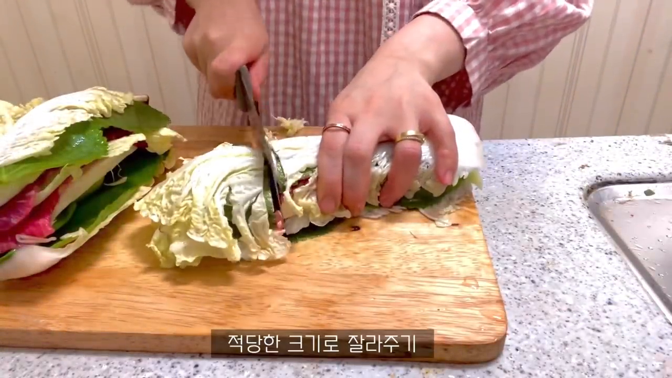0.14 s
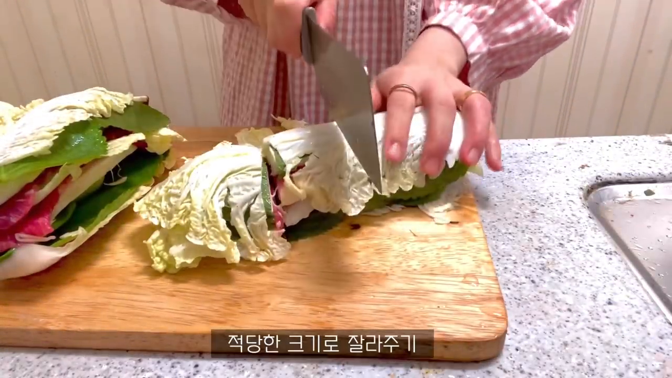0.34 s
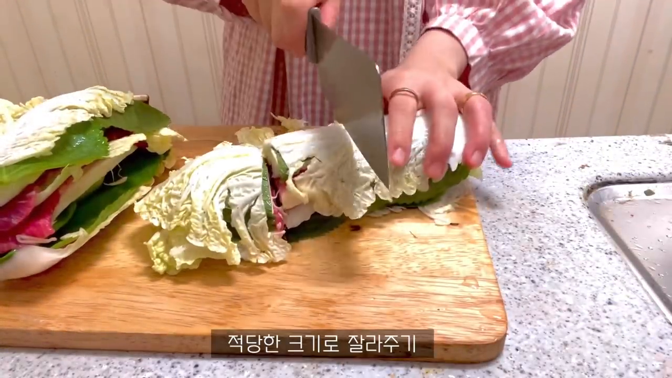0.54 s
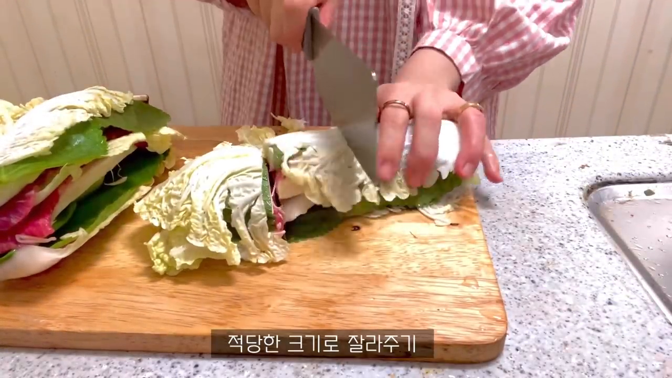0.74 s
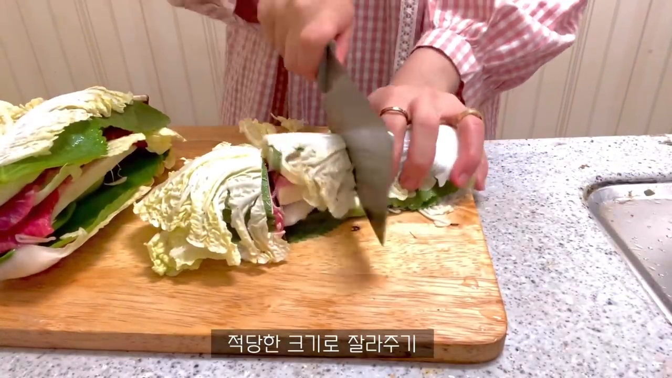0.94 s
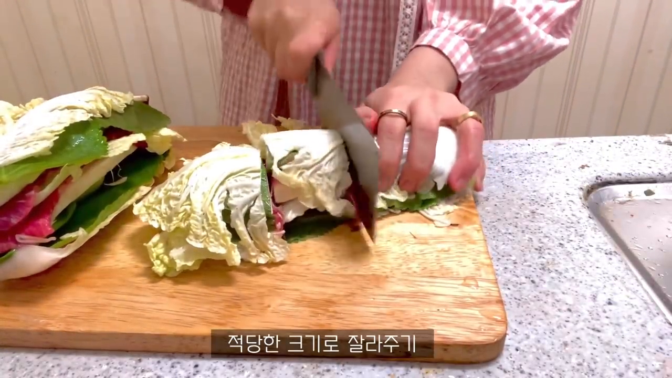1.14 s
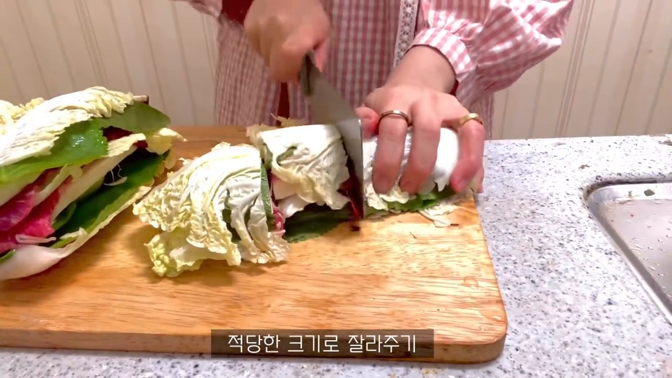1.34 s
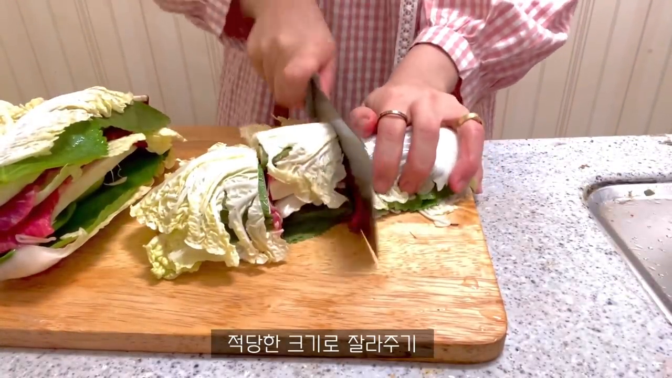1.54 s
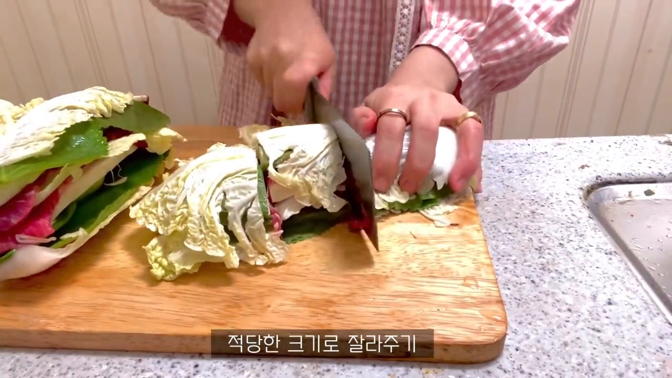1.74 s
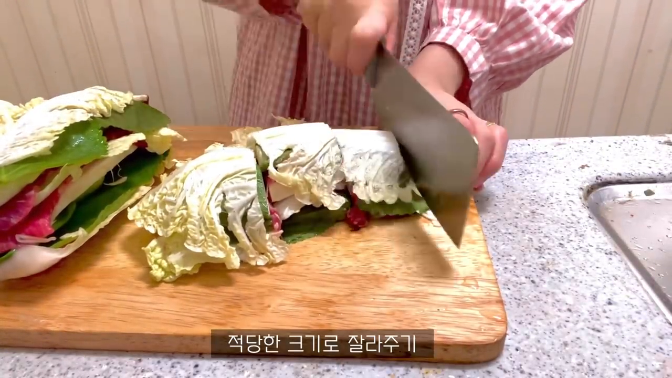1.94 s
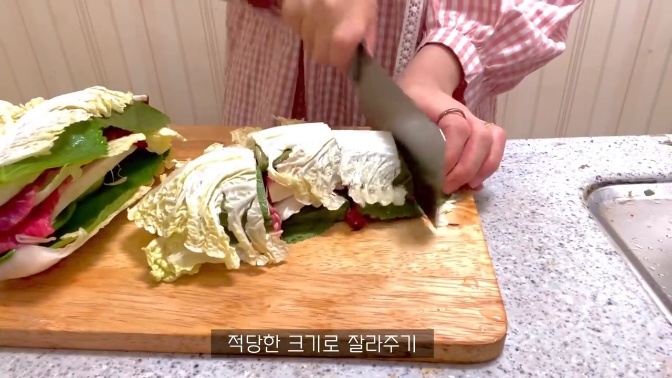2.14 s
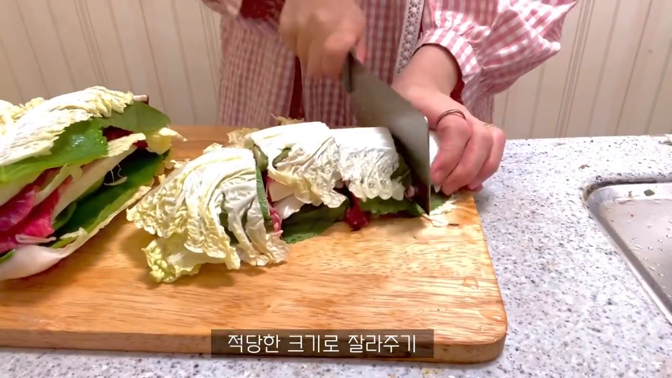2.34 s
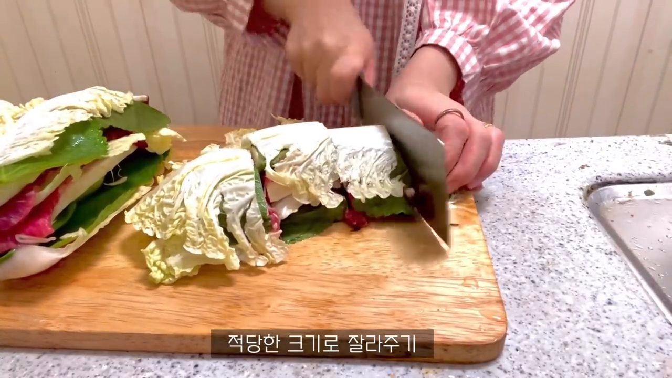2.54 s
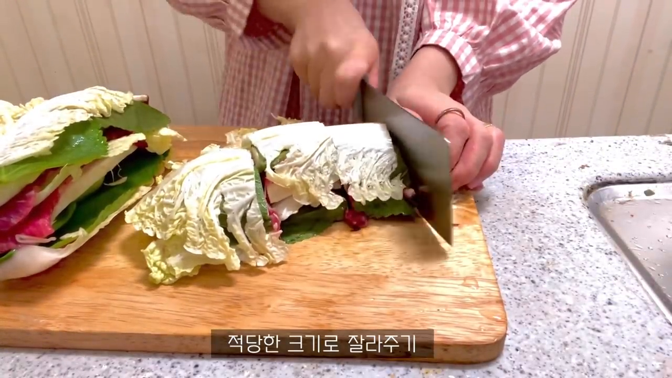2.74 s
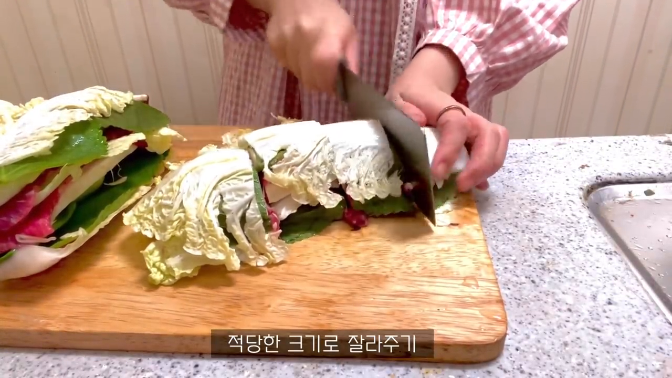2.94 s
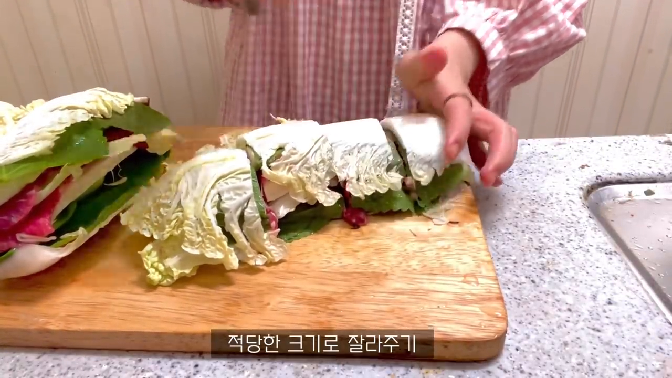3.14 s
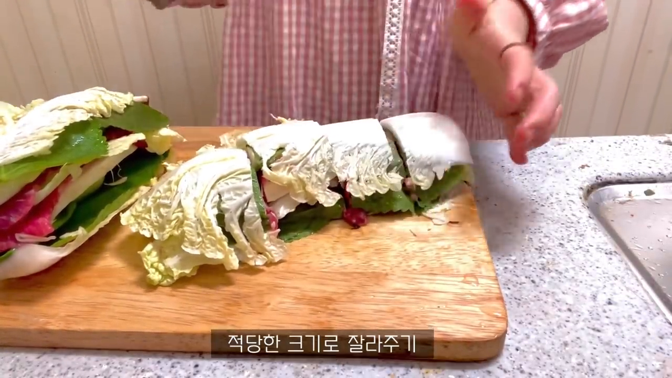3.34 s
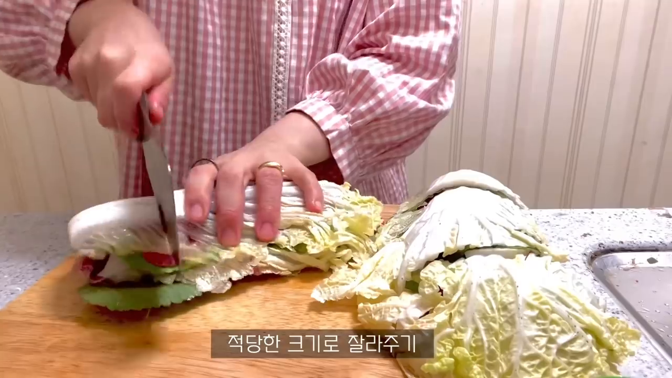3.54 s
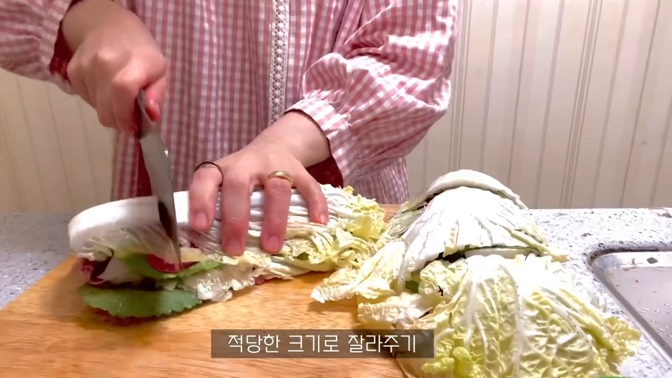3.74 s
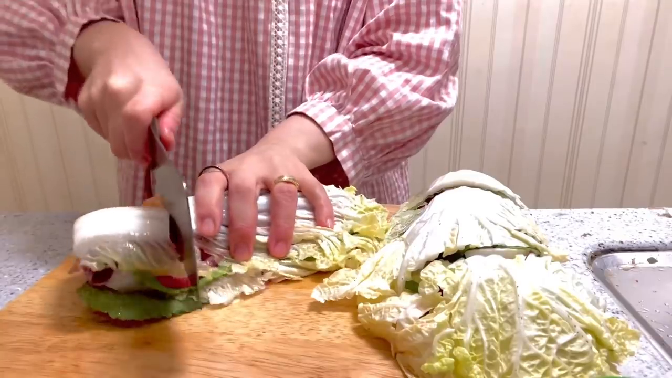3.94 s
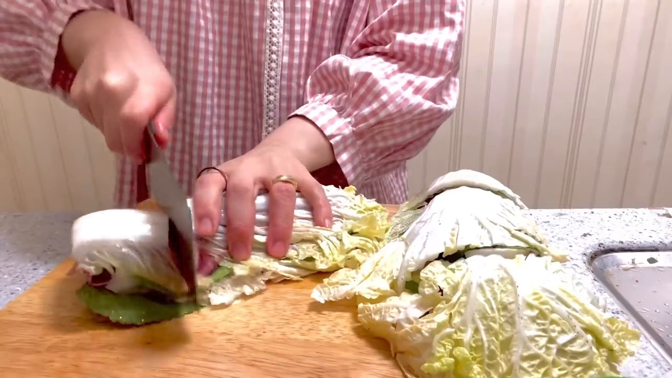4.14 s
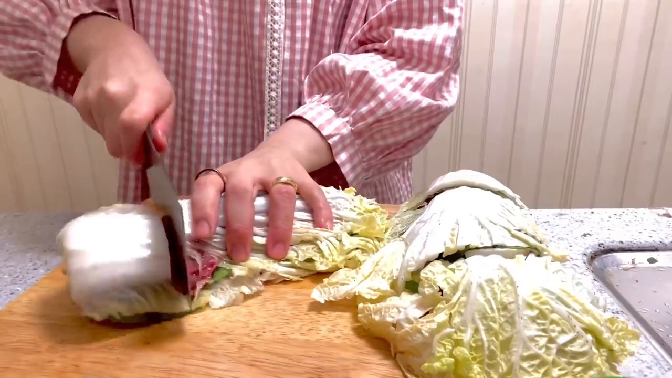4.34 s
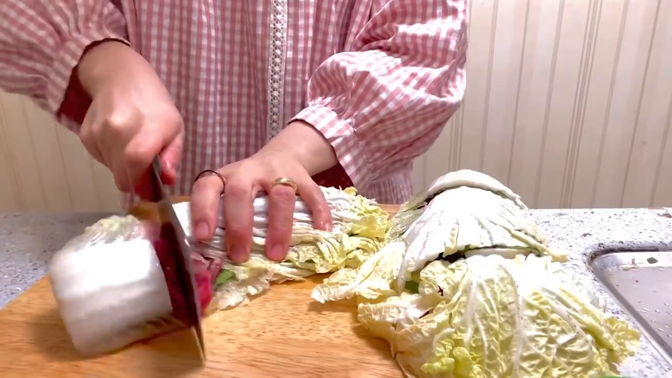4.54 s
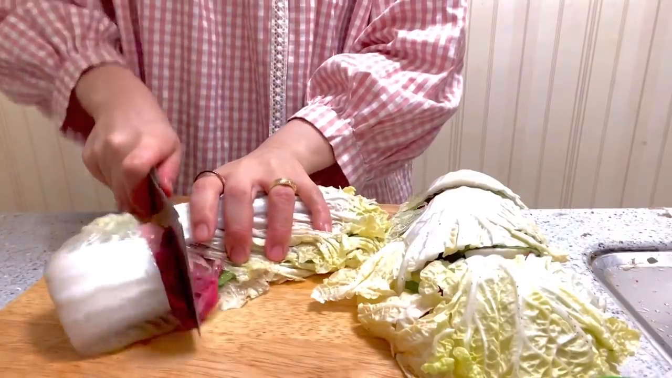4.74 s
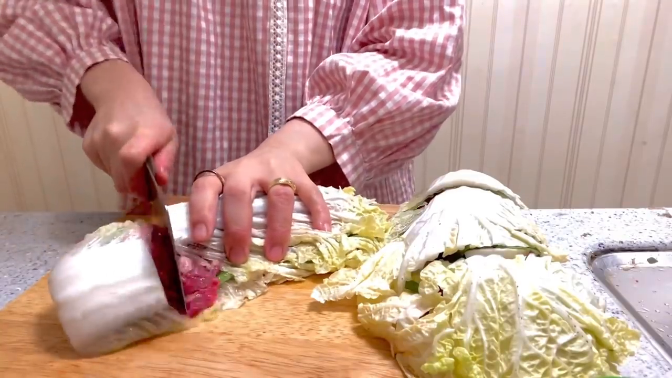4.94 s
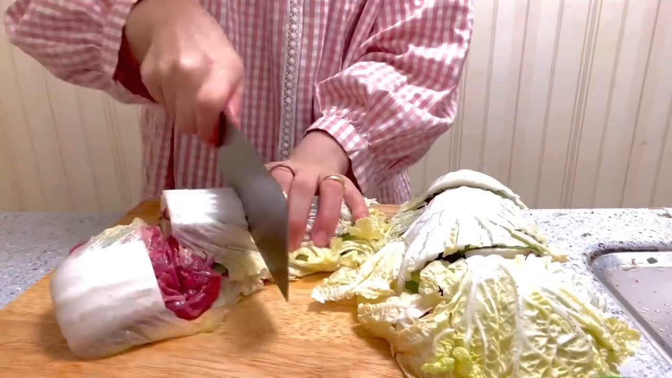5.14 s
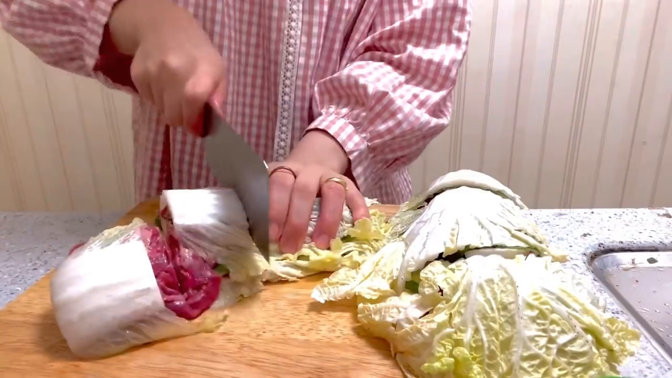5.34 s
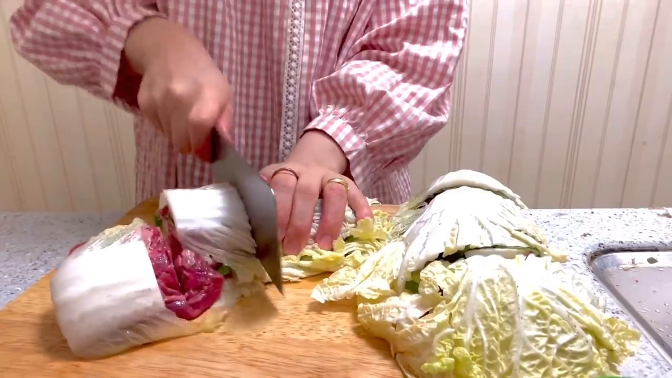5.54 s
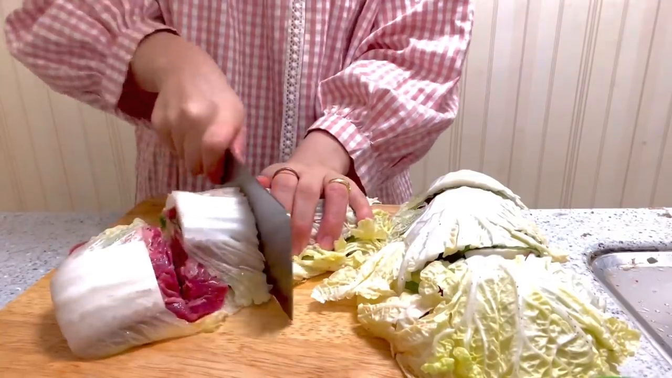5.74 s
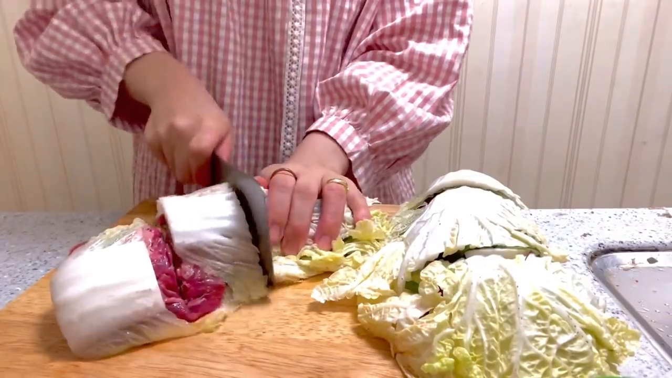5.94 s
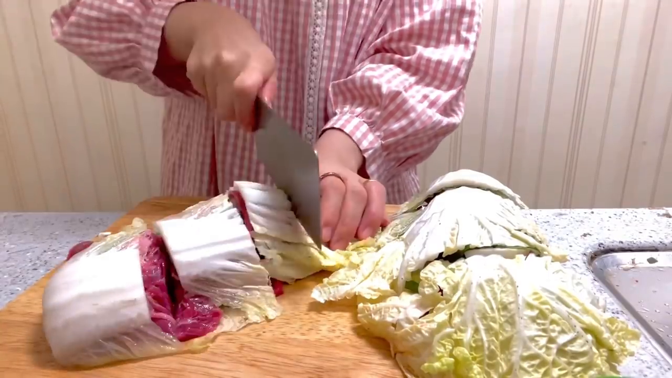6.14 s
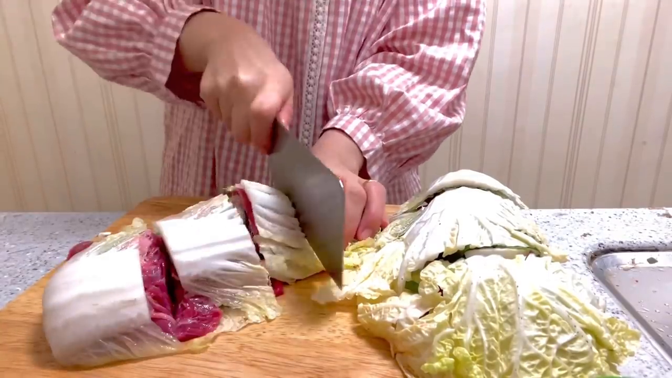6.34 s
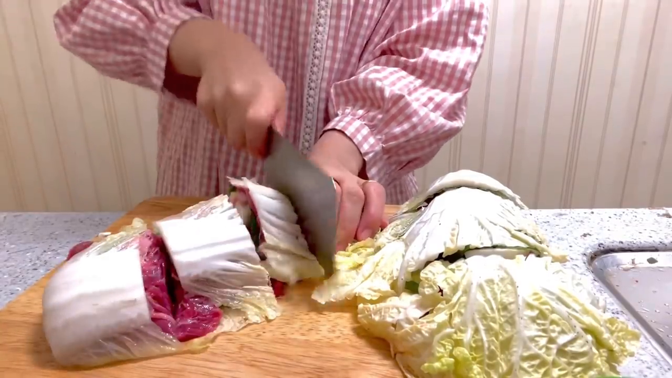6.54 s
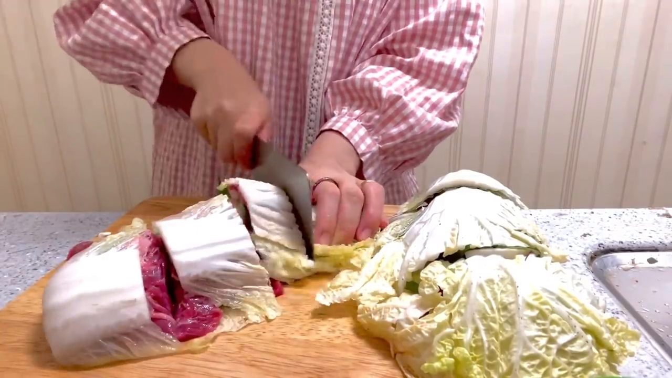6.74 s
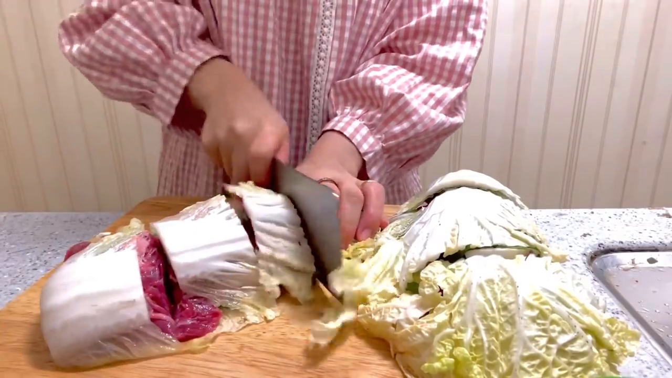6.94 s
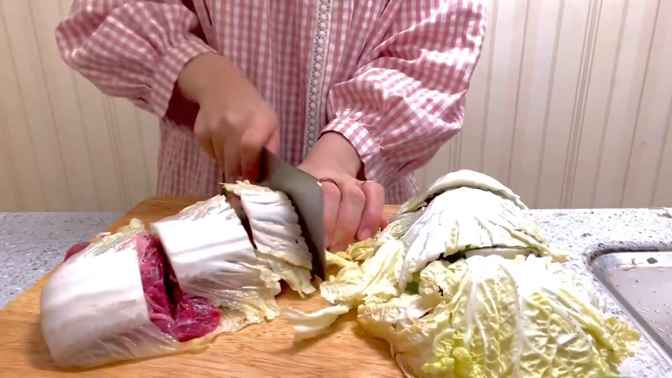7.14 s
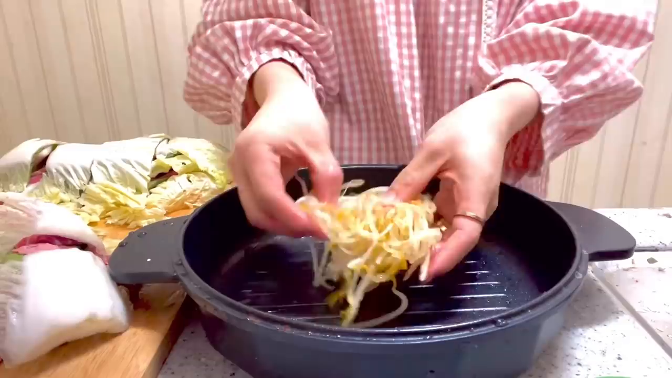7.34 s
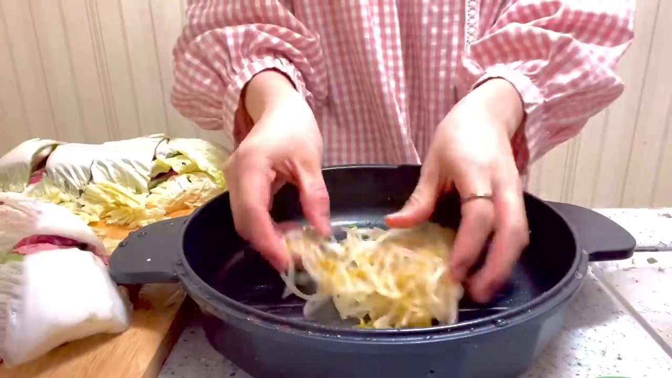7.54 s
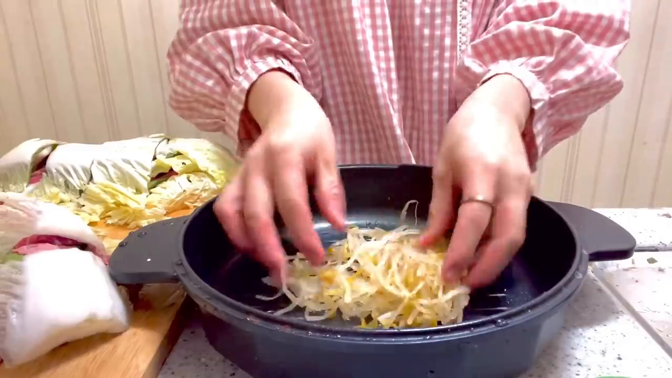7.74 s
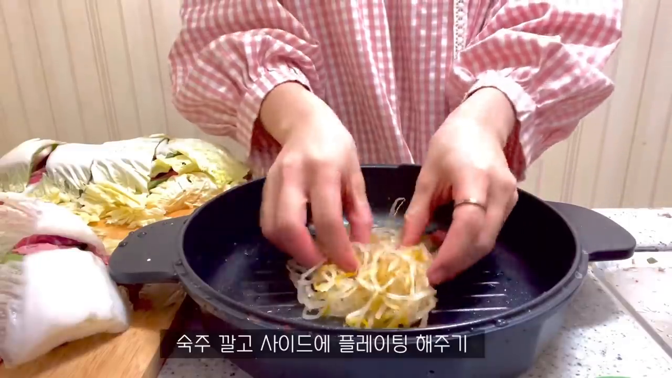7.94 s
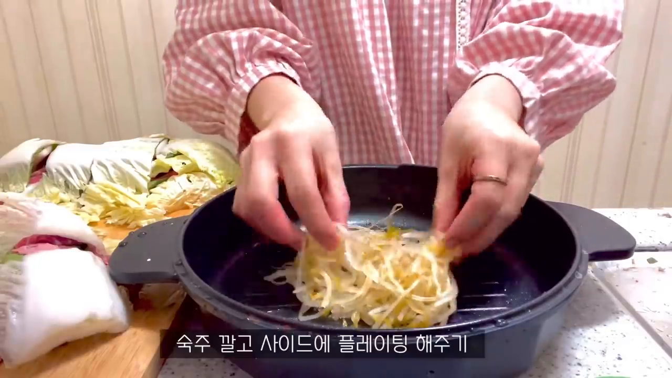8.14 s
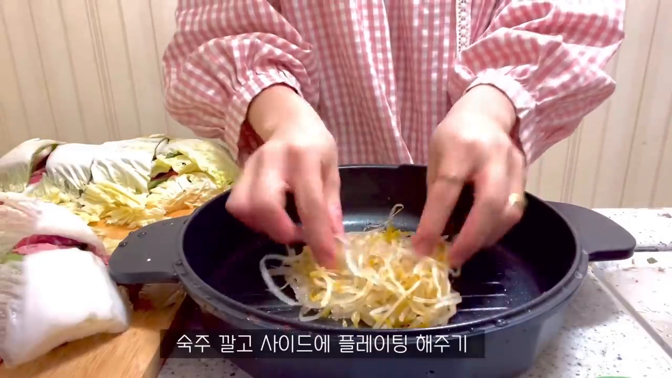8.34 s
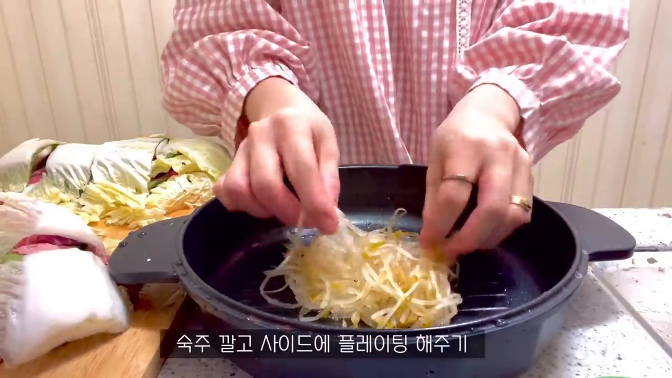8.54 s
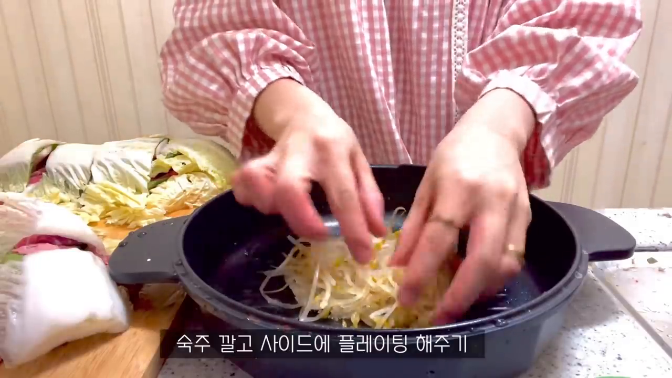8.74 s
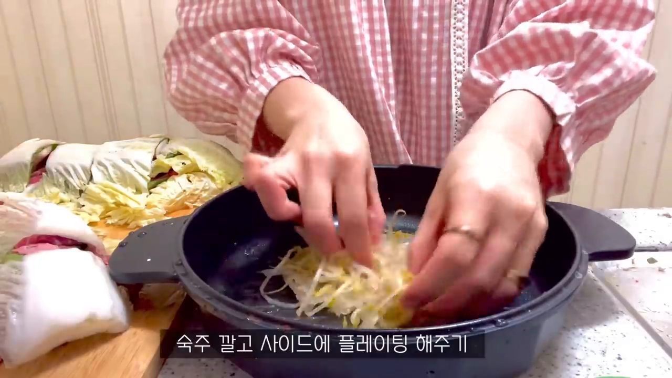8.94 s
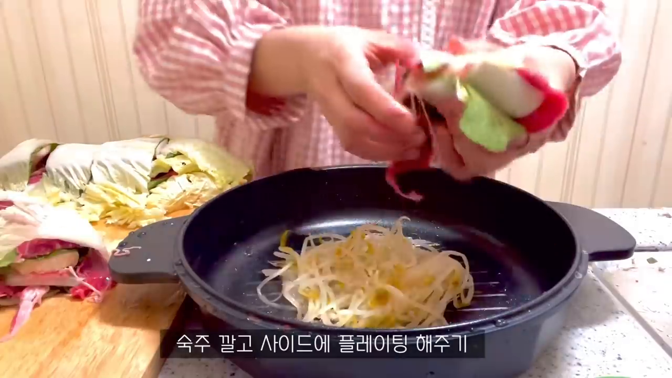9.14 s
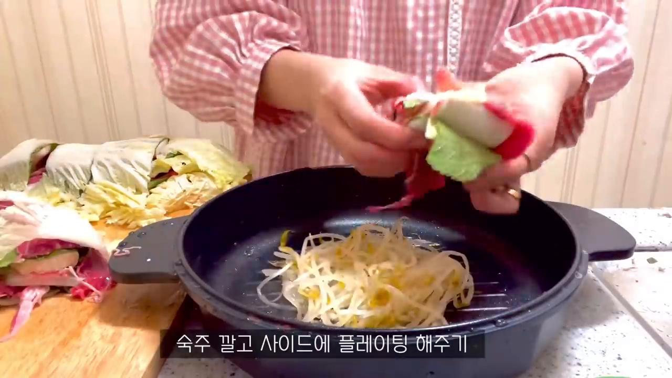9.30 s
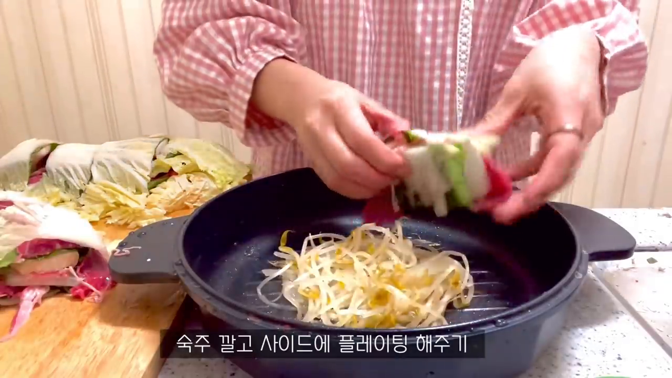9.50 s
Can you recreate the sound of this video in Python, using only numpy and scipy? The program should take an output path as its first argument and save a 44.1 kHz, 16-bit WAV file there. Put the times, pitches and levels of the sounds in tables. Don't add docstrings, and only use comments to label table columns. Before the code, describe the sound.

A knife saws crunchily through layered cabbage on a wooden board with snaps and knocks, then sprouts land softly in a metal pan over low hum.

```python
import sys
import numpy as np
from scipy import signal
from scipy.fft import rfft, irfft, next_fast_len
from scipy.io import wavfile
from scipy.ndimage import uniform_filter1d, map_coordinates

SR = 44100
rng = np.random.default_rng(int(sys.argv[2]) if len(sys.argv) > 2 else 0)


def boost_factor(decibels):
    exponent = np.asarray(decibels, float) / 20
    return 10 ** exponent


def file_out(sig):
    cols = np.atleast_2d(sig).T
    lim = np.clip(cols, -1, 1)
    pcm = np.round(lim * 32767).astype(np.int16)
    wavfile.write(sys.argv[1], SR, pcm)


N = 422037

# peak force t/s, length/s, scrape level/dB, crackle level/dB
STROKES = [(0.037, 0.23, -37, -46.5), (0.19, 0.13, -45.5, -58.5), (0.299, 0.07, -58.5, -58.5),
           (0.528, 0.047, -52, -60.5), (0.687, 0.23, -51.5, -51), (0.84, 0.25, -41.5, -40),
           (0.992, 0.16, -46.5, -43.5), (1.129, 0.25, -46.5, -45), (1.327, 0.44, -49, -44.5),
           (1.393, 0.18, -30, -38), (1.562, 0.23, -38.5, -47), (1.692, 0.16, -36.5, -50),
           (1.827, 0.14, -63, -40), (1.906, 0.08, -33.5, -35.5), (2.009, 0.24, -44, -46),
           (2.156, 0.33, -37.5, -38.5), (2.274, 0.15, -58.5, -47), (2.395, 0.21, -40.5, -37),
           (2.559, 0.16, -38.5, -41.5), (2.707, 0.16, -42, -48), (2.853, 0.17, -43, -54),
           (2.963, 0.2, -64, -62.5),
           (3.456, 0.088, -49.5, -58), (3.513, 0.083, -32, -30.5), (3.601, 0.18, -91, -51),
               (3.863, 0.19, -49.5, -51), (4.017, 0.1963, -59.5, -51.5), (4.165, 0.21, -48, -44.5),
               (4.304, 0.22, -55, -61.5), (4.461, 0.22, -43.5, -41), (4.585, 0.12, -47, -55),
               (4.717, 0.23, -32, -38), (4.863, 0.19, -41, -51), (5.04, 0.5, -48.5, -53.5),
               (5.232, 0.11, -43, -45), (5.426, 0.52, -46.5, -45), (5.518, 0.16, -47, -48.5),
               (5.666, 0.11, -39.5, -38), (5.723, 0.2, -50, -55.5), (5.824, 0.15, -37.5, -51.5),
               (5.968, 0.21, -34, -42), (6.108, 0.1, -44, -45), (6.221, 0.36, -59, -52),
               (6.377, .18, -51, -47), (6.545, 0.24, -39.5, -37), (6.705, 0.24, -34.5, -42.5),
               (6.804, 0.19, -38, -44), (6.97, 0.26, -45, -48), (7.123, 0.17, -51, -54),
               (7.289, 0.28, -50.5, -49)]
# peak force t/s, length/s, scrape level/dB, crackle level/dB
HEAPING = [(7.436, 0.61, -63, -63.5), (7.53, 0.081, -55.5, -54), (7.664, 0.098, -58, -62),
           (7.842, 0.38, -69, -61.5), (7.96, 0.38, -79, -59), (8.404, 0.28, -68, -65),
           (8.833, 0.43, -62.5, -55.5), (9.191, 0.27, -67, -65), (9.39, 0.29, -54, -58.5)]
# from t/s, scrape level/dB, crackle level/dB
RESTING = [(0, -51.5, -64.5), (0.189, -76.5, -88), (0.64, -62, -65.5), (3.0, -69.5, -73.5),
           (3.125, -91, -99), (3.435, -64.5, -64), (7.359, -82, -69.5), (8.1, -81.5, -80)]
SCENE_CHANGES_S = [0, .19, 3.435, 7.358, 10]
SHOULDER = [
    [1.58],
    [1.67],
]
# f/Hz, level/dB per Hz
CRISP = [(800, -57), (2000, 7.5), (3500, 7.5), (5000, 12), (6500, 7), (9000, 9), (12000, 11), (15500, 4.5)]
# f/Hz, level/dB per Hz
SCRAPE = [(250, 16.5), (500, 16), (900, 17), (1500, 14.5), (2500, 8), (4000, 2), (8000, -111)]
# t/s, peak level/dB, f/Hz, tick level/dB re peak
SNAPS = [(0.5191, -27.5, 9700, -22), (0.7505, -24, 1850, -6), (0.816, -22, 1500, -6),
         (1.094, -13, 2940, -12), (1.3879, -19, 1440, -10), (1.8105, -17, 9200, -23),
         (1.8682, -22.5, 1480, -5), (1.976, -11.5, 1730, -13.5), (2.195, -15, 1130, -11.5),
         (2.3462, -36, 1993, -1), (2.4093, -10, 3150, -20), (2.971, -41, 7000, -1), (3.4842, -30, 1000, -9),
         (4.0742, -46, 1500, 9.5), (4.1824, -10.5, 3150, -26.5), (4.2375, -28, 2500, -18),
         (4.305, -23.5, 2980, -17), (4.4237, -26, 2720, -8), (4.464, 0.5, 3270, -30.5),
         (4.638, -28, 1750, -29.5), (4.673, -15.5, 2640, -27), (4.7386, -16, 2640, -14),
         (5.0897, -43.5, 1590, 6), (5.3796, -27, 2120, -2.5), (5.4809, -12.5, 1660, -13),
         (5.635, -31.5, 1800, -1.5), (5.83, -30, 1200, -10.5), (5.898, -27.5, 1900, -9),
         (5.921, -24.5, 1900, -13), (4.03, -26.5, 2610, -8.5), (6.224, -25.5, 2040, -10),
         (6.4648, -17.5, 3800, -12), (6.508, -19, 2180, -16.5), (6.669, -14, 1510, -18)]
# t/s, peak level/dB, f/Hz
TICKS = [(0.2866, -52, 2130), (0.5242, -39, 8510), (0.6418, -36.5, 8750), (0.8275, -22, 1400),
         (0.8015, -35.5, 4040), (0.8041, -28.5, 9400), (0.815, -19.5, 9150), (0.9542, -34, 8950),
         (1.0975, -17, 2820), (1.2496, -26, 8750), (1.3414, -30.5, 2140), (1.3935, -14, 2640),
         (1.7863, -35, 9270), (1.8111, -15, 9130), (1.8682, -32.5, 4280), (2.0517, -18.5, 9100),
         (2.0874, -25.5, 1980), (2.3446, -33.5, 2060), (2.3831, -23.5, 2720), (2.9707, -36.5, 7470),
         (3.471, -38, 2000), (3.4433, -45, 2980), (3.8341, -29.5, 10800), (3.9768, -38, 2000),
         (4.0743, -35, 2740), (4.1589, -25, 2800), (4.1824, -34, 2600), (4.2393, -30, 2100),
         (4.3047, -26.5, 2770), (4.4086, -40.5, 2560), (4.425, -26.5, 2640), (4.4643, -24, 2610),
         (4.6793, -28.5, 2640), (4.739, -17, 2640), (4.7925, -24.5, 2320), (5.088, -36, 8020),
         (5.1783, -30, 9670), (5.2343, -32, 2230), (5.328, -34, 2100), (5.4123, -23.5, 2060),
         (5.4808, -17.5, 2550), (5.5204, -30, 2080), (5.641, -27, 4630), (5.6755, -20, 7500),
         (5.7705, -30, 8000), (5.528, -28, 7500), (5.9155, -39, 2090), (6.1026, -27.5, 10200),
         (6.2212, -32, 3420), (6.4632, -28.5, 3740), (6.5076, -28.5, 2130), (6.6208, -34.5, 8730),
         (6.6742, -20.5, 2100), (6.7555, -32, 2010)]
# t/s, peak level/dB, f/Hz
VEINS = [(0.0594, -33, 996), (0.1194, -42.5, 1070), (0.8924, -33.5, 1970), (1.1694, -35, 2050),
         (1.2994, -40, 900), (1.3633, -22, 1092), (1.5499, -32, 902), (1.6194, -40, 902),
         (1.6661, -35.5, 1070), (1.7194, -34, 1120), (1.8956, -28, 1960), (1.9894, -23, 2080),
         (2.0318, -32.5, 1400), (2.1221, -33.5, 1060), (2.1555, -22, 1500), (2.2548, -38.5, 1650),
         (2.5147, -38, 907), (2.5794, -32.5, 1120), (2.6763, -37.5, 1150), (2.7394, -42, 910),
         (2.8355, -39.5, 912), (2.8579, -39, 1130), (3.8975, -35, 2610), (4.0277, -35, 2720),
         (4.4894, -24, 902), (4.6573, -27.5, 2190), (4.7022, -23, 900), (4.7721, -30.5, 1760),
         (5.4326, -29, 2130), (5.6544, -30, 2000), (5.6735, -30, 902), (5.7698, -38, 2640),
         (5.8494, -46, 1110), (5.9668, -20.5, 1800), (6.0194, -39, 929), (6.0696, -43, 1360),
         (6.5594, -35.5, 902), (6.7096, -28.5, 1140), (6.7999, -30, 902), (6.8538, -31, 921)]
# t/s, peak level/dB, then level/dB re peak of counter thump, board hollow, edge
KNOCKS = [(0.453, -40, 13, 1, -31), (0.698, -20.5, 5.5, -8, -15.5), (0.814, -47, 15.5, 9.5, -10),
          (1.095, -31, 2, -6.5, -1.5), (1.409, -7, -22, -22.5, -20.5), (1.81, -31.5, -2.5, -16, -15),
          (1.975, -28.5, -25, -41, -24), (2.163, -26.5, -4, -6, -8), (2.384, -27, -8, -16, -17.5),
          (2.409, -14.5, -7, -1.5, -24.5), (3.137, -23, 4, -7.5, -4.5), (3.523, -27, -8, -8, -14),
          (4.172, -48, 16.5, -5, -22), (4.464, -9, -8, -6, -15.5), (4.738, -24, 0, -13, -31.5),
          (5.481, -27, -5.5, -45, -19.5), (5.693, -15, -9.5, -11.5, -35), (5.916, -29, -3.5, -26, -9),
          (6.755, -31, -17, -14.5, -11)]
# f/Hz, width/Hz, level/dB
BOARD = [(604, 37, -4.5), (742, 33, 1), (876, 68, -6), (1025, 19, -4.5), (1102, 57, -5.5),
         (1390, 310, -17.5), (2640, 130, -16.5)]
# f/Hz, width/Hz, level/dB
SLAP = [(824, 400, -9)]
# f/Hz, width/Hz, level/dB
BOOM = [(132.8, 19.9, 10.5), (253.2, 16.8, 9), (458, 48.5, -6.5)]
# f/Hz, level/dB, t60/s
LAID = [(423, -1.5, 0.17), (780, -11, 0.14), (883, 1, 0.094), (1015, -18, 0.13), (1130, -8, 0.15),
        (1490, -25, 0.23), (1580, -10.5, 0.1), (1900, -16.5, 0.09), (2430, -28, 0.11), (2649, -10, 0.077)]
# t/s, length/s, level/dB, from f/Hz, to f/Hz
SQUEAKS = [(4.838, .075, -39, 590, 880), (3.845, .045, -46, 560, 640), (4.272, .035, -49, 900, 1550)]
# from t/s, to t/s, level/dB
RUBS = [(6.78, 6.867, -44.5), (6.914, 7.031, -44), (7.066, 7.165, -50), (7.211, 7.354, -44)]
# f/Hz, width/Hz, level/dB
RUB = [(600, 70, -12), (760, 40, -10), (920, 30, -2), (1045, 30, 0), (1120, 30, -3), (1325, 35, -4),
       (1520, 60, -3), (1960, 90, -14), (2630, 50, -6)]
# f/Hz, width/Hz, level/dB
RASP = [(1200, 750, -7)]
# t/s, level/dB, brightness/dB per octave
DROPS = [(7.397, -62, 12), (7.422, -65, 11), (7.445, -63, 11), (7.505, -55, 1), (7.535, -62, 6),
         (7.588, -59.5, 8), (7.612, -70, 1), (7.644, -47.5, 1.5), (7.735, -69, -2), (7.885, -68, 5),
         (8.092, -64, -5), (8.373, -54.5, -3), (8.722, -70, 10), (8.822, -57.5, -1)]
# f/Hz, width/Hz, level/dB
PAN_FLOOR = [(450, 40, -9), (900, 22, 0), (1175, 18, -3), (1430, 25, -12), (1800, 20, -15), (2260, 30, -11),
             (2345, 30, -10)]
# t/s, level/dB, f/Hz
THUDS = [(7.39, -45.5, 210), (7.44, -49, 66), (8.375, -40, 220), (8.37, -49, 480), (9.337, -46.5, 400)]
# t/s, level/dB
CLINKS = [
    (9.334, -18),
    (9.416, -31.5),
]
# f/Hz, level/dB, t60/s
RIM = [(931, -14, .17), (1010, -12, .1), (1635, -19, .08), (2050, -18, .07), (2230, -10, .065),
       (2608, 1, .12), (2950, -17, .05), (3390, -15, .18), (3855, -2, .11), (6724, -20, .075),
       (4745, -19, .09), (5228, -25, .2), (7903, -16, .07), (9170, -24, .09)]
# f/Hz, level/dB, t60/s
WALL = [(937, -21, .35), (991, -18, .15), (1643, -3, .95), (1788, -8, .11), (2218, -12, .14),
        (2590, -3, .36), (2990, -9, .06), (3400, -20, .1), (3752, -10, .17)]
# f/Hz, level/dB per Hz
RATTLE = [(500, -17), (1000, -27), (2300, 8), (4350, -19), (5300, 5.5), (8000, -8), (10800, -11.5),
          (11500, -56)]
# t/s, level/dB
JOLTS = [(0.01, -37), (0.16, -38.5), (0.49, -37), (0.73, -31.5), (0.87, -38.5), (1.14, -33.5), (1.4, -35),
         (1.52, -33.5), (1.66, -34.5), (1.84, -32.5), (2.17, -31), (2.399, -35), (2.528, -32.5),
         (2.67, -37), (2.81, -40.5), (3.179, -29), (3.551, -30.5), (4.202, -33.5), (4.492, -29),
         (4.95, -36.5), (5.25, -39.5), (5.47, -38), (5.75, -29), (6.069, -38.5), (6.6, -38.5),
         (6.75, -37.5), (6.92, -36), (7.07, -36), (7.22, -40)]
# t/s, level/dB, f/Hz
BUMPS = [
    (9.014, -22, 96),
    (9.052, -16, 86),
    (9.0901, -10.5, 73.96),
]
# f/Hz, width/Hz, level/dB
HUM = [(76.6, 4.9, -3), (110.6, 6.3, -3.5), (133.3, 6, -2.5), (148, 4.4, -36), (204, 2.8, -17.5),
       (245.5, 15, -15.5), (269, 3.9, -15.5), (367, 2.5, -37.5)]
# f/Hz, level/dB per Hz
AIR = [(20, -45), (60, 7.5), (300, -6.5), (500, -10), (800, -30), (2000, -42.5), (9000, -44), (16000, -35)]
# f/Hz, t60/s
KITCHEN = [(150, .25), (1000, .16), (4000, .11), (12000, .07)]
# f/Hz, level/dB
ROOM_COLOUR = [(100, -12), (300, -9), (1000, 0), (4000, 0), (10300, -5), (12000, -22), (13500, -8),
               (16000, -10)]
# f/Hz, phase/rad
PORTS = [(20, 0), (500, -.5), (2000, -1), (4400, -2.3), (6000, -2.1), (8500, 0), (10300, 1.7), (11400, 3.0),
         (12700, 3.3), (13700, 4.7), (15500, 6.2)]

PAN_S, NUDGE_CUT_S = 7.358, 9.104
LEAD_S = 0.012


def unit(x):
    return x / np.sqrt(np.mean(x ** 2) + 1e-20)


def along(points, hz):
    f, v = np.transpose(points)
    return np.interp(np.log(hz + 1), np.log(f + 1), v)


def wobble(rate_hz):
    knots = rng.standard_normal(int(N * 400 / SR) + 4)
    return map_coordinates(knots, [np.arange(N) * min(rate_hz, 399) / SR])


def sine(hz, t):
    return np.sin(2 * np.pi * hz * t)


def decay(t, t60_s):
    return boost_factor(-60 * t / t60_s)


def filtered(x, response):
    m = next_fast_len(N + SR // 2)
    return irfft(rfft(x, m) * response(np.fft.rfftfreq(m, 1 / SR)), m)[..., :N]


def coloured(x, spectrum):
    return unit(filtered(x, lambda hz: boost_factor(along(spectrum, hz))))


def resonant(modes):
    def response(f):
        total = 0
        for k, (centre, width, db) in enumerate(modes):
            damping = 1j * f * width
            total = total + (-1) ** k * boost_factor(db) * damping / (centre * centre - f * f + damping)
        return total
    return response


def band_pass(x, low_hz, high_hz):
    return signal.lfilter(*signal.butter(1, [low_hz, min(high_hz, .45 * SR)], "band", fs=SR), x)


def grit(share, spread_db, bed):
    hit = rng.random(N) < share
    size = np.minimum(rng.exponential(size=N), 2.5)
    noise = rng.standard_normal((2, N))
    return unit(unit(hit * boost_factor(spread_db * size) * np.tanh(noise[0])) + bed * noise[1])


def add(track, s, sound):
    part = track[round(s * SR):][:len(sound)]
    part += sound[:len(part)]


def leaves():
    time = np.arange(N) / SR
    scrape_gain, crackle_gain = strokes()
    clump, bursts = wobble(45), grit(.006, 4, bed=.5)
    fizz = bursts + 0.85 * boost_factor(2.6 * wobble(300)) * rng.standard_normal(N)
    crackle = coloured(boost_factor(3.3 * clump) * fizz, CRISP)
    pops = filtered(grit(0.0025, spread_db=6.5, bed=0), resonant([(2480, 3200, -13)]))
    drag = boost_factor(3.1 * clump) * (bursts + .8 * rng.standard_normal(N))
    glide = boost_factor(0.52 * clump) * (.4 * bursts + rng.standard_normal(N))

    def through(modes, ring, push):
        return unit(filtered(push, lambda f: boost_factor(along(SCRAPE, f)) * (1 + ring * resonant(modes)(f))))

    crackle_re_scrape_db = 20 * np.log10(crackle_gain / scrape_gain)
    lean = np.pi / 4 * (1 + np.tanh((crackle_re_scrape_db + 8) / 3))
    ringing = np.where(time < PAN_S, through(RUB, 5.5, glide), through(PAN_FLOOR, 9, drag))
    damped = through(BOARD, 1.2, drag)
    scrape = (np.cos(lean) * ringing + np.sin(lean) * damped) / np.sqrt(1 + .7 * np.sin(2 * lean))
    return patchy(boost_factor(-2.0) * crackle_gain * (crackle + 2 * pops) + boost_factor(-4.5) * scrape_gain * scrape)


def strokes():
    rise_share, roundness = 0.41, 2.97
    time = np.arange(N) / SR
    start, *rest_db = np.transpose(RESTING)
    power = boost_factor(2 * np.array(rest_db))[:, np.searchsorted(start, time, side="right") - 1]
    for s, length, *db in STROKES + HEAPING:
        shot = np.searchsorted(SCENE_CHANGES_S, s)
        first_s = max(s - length, SCENE_CHANGES_S[shot - 1])
        last_s = min(s + length, SCENE_CHANGES_S[shot])
        span = slice(round(first_s * SR), round(last_s * SR))
        away = np.maximum((s - time[span]) / rise_share, (time[span] - s) / (1 - rise_share)) / length
        swell = np.clip(1 - away ** np.array(SHOULDER), 0, 1) ** roundness
        power[:, span] += (boost_factor(np.array(db))[:, None] * swell) ** 2
    return np.sqrt(power)


def patchy(x):
    depth_db, height_hz, length_s = 3.5, 1100, .012
    z = signal.stft(x, nperseg=256)[2]
    field = rng.standard_normal(z.shape)
    field = uniform_filter1d(field, size=max(1, round(height_hz * 256 / SR)), axis=0)
    field = uniform_filter1d(field, size=max(1, round(length_s * SR / 128)), axis=1)
    return signal.istft(z * boost_factor(depth_db * unit(field)), nperseg=256)[1][:N]


def snaps():
    out, t = np.zeros(N), np.arange(SR // 50) / SR
    for s, db, hz, tick_db in SNAPS:
        fall = 0.99 * decay(t, 0.0039) + 0.6 * decay(t, 0.036)
        tick = boost_factor(tick_db) * fall * rng.standard_normal(len(t)) * (1 - np.exp(-t / 0.00008))
        add(out, s, boost_factor(db) * (1.1 * tick + .8 * sine(hz, t) * decay(t, 6 / hz)))
    return out


def ticks():
    hiss_t60_s, ring_cycles, rise_s = 0.0056, 5.9, 0.000099
    out, t = np.zeros(N), np.arange(SR // 100) / SR
    for rows, hiss_db in ((TICKS, 0), (VEINS, -8.5)):
        for s, db, hz in rows:
            hiss = rng.standard_normal(len(t)) * boost_factor(hiss_db) * decay(t, hiss_t60_s)
            ring = .9 * sine(hz, t) * decay(t, ring_cycles / hz)
            add(out, s, boost_factor(db) * (hiss + ring) * (1 - np.exp(-t / rise_s)))
    return out


def knocks():
    overtone_db, lead_db = -8, -10.5
    deep_hz, deep_t60_s, deep_db = 418, .16, -11
    (contact, edge, boom), t = np.zeros((3, N)), np.arange(SR // 4) / SR
    for s, db, thump_db, hollow_db, edge_db in KNOCKS:
        rattle = rng.standard_normal((2, len(t))) * (2.54 * decay(t, 0.012) + 0.89 * decay(t, 0.031))
        add(contact, s, boost_factor(db) * (rattle[0] + 19 * np.exp(-t / 0.000079)))
        add(edge, s, boost_factor(db + edge_db - 4.5) * rattle[1])
        lead_in = rng.standard_normal(len(t)) * (t < LEAD_S) * t / LEAD_S
        add(edge, s - LEAD_S, boost_factor(db + edge_db + lead_db) * lead_in)
        for (hz, width, _), rel_db in zip(BOOM, (thump_db, hollow_db + overtone_db, hollow_db)):
            swell = (1 - np.exp(-(t * hz / 2.04) ** 2)) * np.exp(-np.pi * width * t)
            add(boom, s, boost_factor(db + rel_db + 11.0) * swell * sine(hz, t))
        deep = decay(t, deep_t60_s) * (1 - np.exp(-t / 0.004)) * sine(deep_hz, t)
        add(boom, s, boost_factor(db + hollow_db + deep_db) * deep)

    def wood(f):
        ring = 0.019 + resonant(BOARD)(f) + resonant(SLAP)(f)
        return ring / (1 + 1j * f / 3600) ** 4 * f / (f + 300)

    def band(f):
        return boost_factor(along([(600, -42), (1300, 15.5), (2200, 13.5), (3500, -1.0), (5500, -22.5), (16000, -61.0)], f))

    return filtered(contact, wood) * 1.85 + filtered(edge, band) + boom


def blade():
    laid_s, laid_db, rise_s = 3.138, -27, 0.003
    out, t = np.zeros(N), np.arange(SR // 3) / SR
    ring = sum(boost_factor(db) * decay(t, t60) * sine(hz, t) for hz, db, t60 in LAID)
    chatter = band_pass(band_pass(3 * rng.standard_normal(len(t)), 1000, 3000), 1200, 3200)
    clatter = boost_factor(-11) * decay(t, 0.069) * chatter
    stray, flutter = wobble(150), .6 + wobble(260)
    landing = ring * (.8 + .4 * flutter[:len(t)]) + clatter
    add(out, laid_s, boost_factor(laid_db) * landing * (1 - np.exp(-t / rise_s)))
    for s, length, db, from_hz, to_hz in SQUEAKS:
        u = np.clip(t / length, 0, 1)
        at = slice(round(s * SR), round(s * SR) + len(t))
        hz = (from_hz + (to_hz - from_hz) * u ** 0.66) * (1 + 0.065 * stray[at])
        swell = np.abs(np.sin(np.pi * u ** 0.64)) ** .5 * (u < 1)
        add(out, s, boost_factor(db) * flutter[at] * swell * np.sin(2 * np.pi * np.cumsum(hz) / SR))
    return out


def rubs():
    rise_s, fall_s, judder_db = 0.007, 0.016, 3
    time, force = np.arange(N) / SR, np.zeros(N)
    for start, stop, db in RUBS:
        force += boost_factor(db) * np.clip(np.minimum((time - start) / rise_s, (stop - time) / fall_s), 0, 1)
    slips = boost_factor(judder_db * wobble(60)) * grit(0.018, spread_db=4.5, bed=0.59)
    return force * unit(filtered(slips, lambda f: resonant(RUB)(f) + resonant(RASP)(f)))


def sprouts():
    out, t = np.zeros(N), np.arange(SR // 8) / SR
    for s, db, tilt_db in DROPS:
        ring = np.zeros(len(t))
        for hz, width, level in PAN_FLOOR:
            mode_db = level + rng.normal(0, 1.3) + tilt_db * np.log2(hz / 1000)
            ring += boost_factor(mode_db) * np.exp(-2 * width * t) * sine(hz, t)
        add(out, s, boost_factor(db) * ring * (1 - np.exp(-t / 0.0031)))
    for s, db, hz in THUDS:
        add(out, s, boost_factor(db) * decay(t, 0.19) * sine(hz, t) * (1 - np.exp(-t / 0.0012)))
    return out


def pan():
    out, t = np.zeros(N), np.arange(SR // 3) / SR
    noise = coloured(rng.standard_normal((2, N)), RATTLE)[:, :len(t)]
    for (s, db), modes, rise_s, scratch in zip(CLINKS, (RIM, WALL), (.0006, .014), noise):
        ring = np.zeros(len(t))
        for hz, level, t60 in modes:
            onset = 1 - np.exp(-(t * hz / (rise_s * 1800)) ** 2)
            ring += boost_factor(level) * decay(t, t60) * onset * sine(hz, t)
        scrape = 0.29 * decay(t, 0.079) * scratch * (1 - np.exp(-t / rise_s))
        add(out, s, boost_factor(db) * (ring + scrape))
        add(out, s - LEAD_S, boost_factor(db - 22.0) * scratch[::-1] * (t < LEAD_S) * t / LEAD_S)
    return out


def counter():
    def rock(hz, stray):
        return np.sin(2 * np.pi * np.cumsum(hz * (1 + stray * wobble(7.7))) / SR)

    rocking = rock(48.6, stray=0.16) + 0.82 * rock(70.05, stray=0.071) + 0.2 * rock(31.0, stray=0.39)
    sway = unit(boost_factor(0.48 * wobble(6.1)) * rocking)
    boom = unit(filtered(boost_factor(7.2 * wobble(30)) * rng.standard_normal(N), resonant(BOOM)))
    nudge, t = np.zeros(N), np.arange(SR // 8) / SR
    for s, db, hz in BUMPS:
        add(nudge, s, boost_factor(db) * decay(t, 0.13) * sine(hz, t) * (1 - np.exp(-t / 0.0079)))
    apart = 0.07 * unit(filtered(wobble(90), lambda f: f > 20)) * [[1], [-1]]
    return jolts() * (sway + apart + boost_factor(-10) * boom) + nudge * (np.arange(N) < NUDGE_CUT_S * SR)


def jolts():
    rise_s, t60_s = 0.038, 0.38
    still_db, calm_db = -50.5, -7
    power = boost_factor(2 * still_db + 2 * calm_db * (np.arange(N + SR) > PAN_S * SR))
    t = np.arange(-SR // 10, SR // 2) / SR
    shape = np.where(t < 0, np.exp(-(t / rise_s) ** 2), decay(t, t60_s))
    for s, db in JOLTS:
        add(power, s, (boost_factor(db) * shape) ** 2)
    return np.sqrt(power[SR // 10:][:N])


def hum():
    noise = rng.standard_normal((2, 2, N))
    drone = boost_factor(-47.5) * unit(filtered(noise[0], resonant(HUM)))
    air = boost_factor(-57.5) * coloured(noise[1], AIR)
    apart = filtered(air[1], lambda hz: boost_factor(along(ROOM_COLOUR, hz)))
    tone_hz = 133 * (1 + .012 * wobble(6))
    tone = boost_factor(-46.5 + 1.6 * wobble(9)) * np.sin(2 * np.pi * np.cumsum(tone_hz) / SR)
    return tone + drone[0] + ports(air[0]) + (0.34 * drone[1] + 2.5 * apart) * [[1], [-1]]


def kitchen(x):
    late_db, late_longer = -19, 2.2
    out = np.zeros((2, N + 2 * SR))
    cuts = np.round(np.array(SCENE_CHANGES_S) * SR).astype(int)
    starts = np.union1d(np.arange(SR // 4, N + SR, SR // 2), cuts)
    for start, stop in zip(starts[starts < N], starts[1:]):
        hz, t, z = signal.stft(rng.standard_normal((2, SR // 3)), SR, nperseg=256)
        fall_db = -60 * t / along(KITCHEN, hz)[:, None]
        fall = boost_factor(fall_db) + boost_factor(late_db + fall_db / late_longer)
        z = z * boost_factor(along(ROOM_COLOUR, hz)[:, None]) * fall
        tail = np.pad(signal.istft(z, SR, nperseg=256)[1], ((0, 0), (130, 0)))
        answer = signal.fftconvolve(x[None, start:stop], tail / np.linalg.norm(tail[0]), axes=1)
        answer = answer[:, :cuts[cuts > start][0] - start]
        out[:, start:][:, :answer.shape[1]] += answer
    return out[:, :N]


def ports(x):
    return filtered(x, lambda hz: np.exp(.5j * along(PORTS, hz) * np.array([[1], [-1]])))


def scene():
    close = leaves() + sprouts() + blade() + rubs()
    clicks = band_pass(snaps() + ticks(), low_hz=600, high_hz=12020)
    blows, metal = knocks(), pan()
    far = kitchen(close + 0.8 * clicks + .9 * blows + 0.71 * metal)
    direct = ports(close + clicks + blows + metal)
    return boost_factor(1.5) * (direct + boost_factor(-6.0) * far) + counter() + hum()


def band_limit(x):
    return signal.sosfilt(signal.butter(12, 17000, fs=SR, output="sos"), x)


def record(dry):
    mix = filtered(dry, lambda hz: hz < 15800)
    return band_limit(mix)


dry = scene()
out = record(dry)
file_out(out)
```